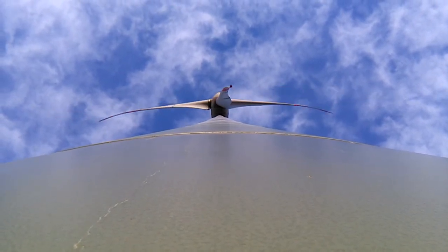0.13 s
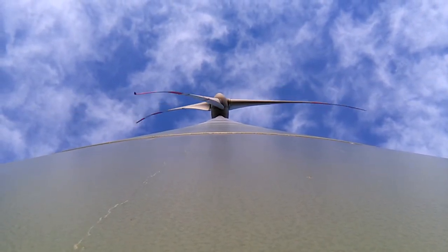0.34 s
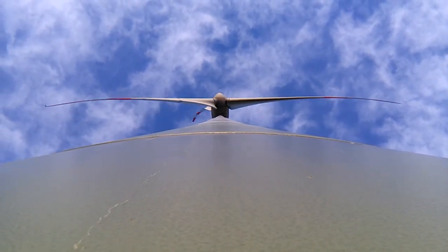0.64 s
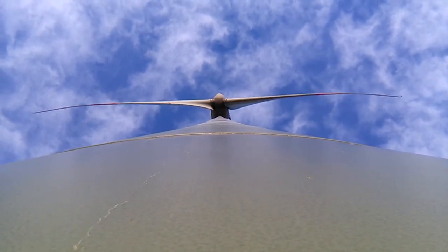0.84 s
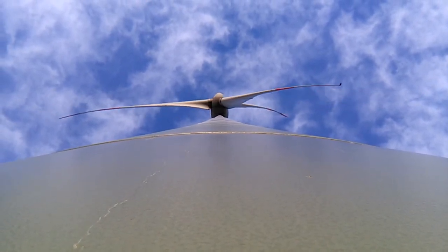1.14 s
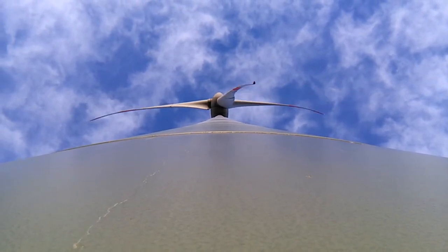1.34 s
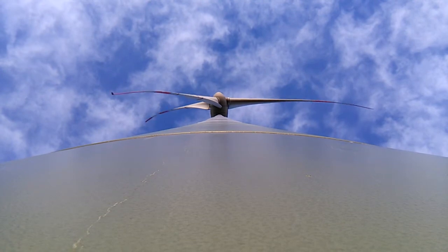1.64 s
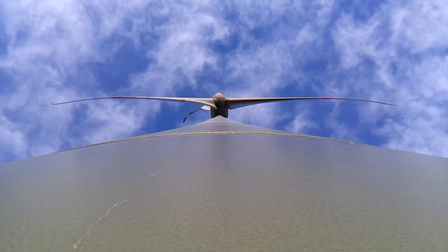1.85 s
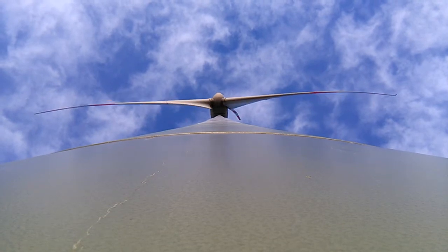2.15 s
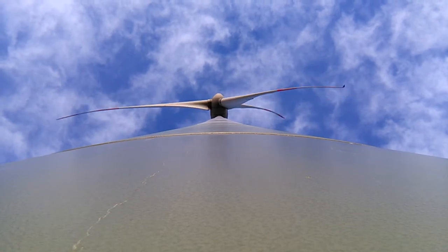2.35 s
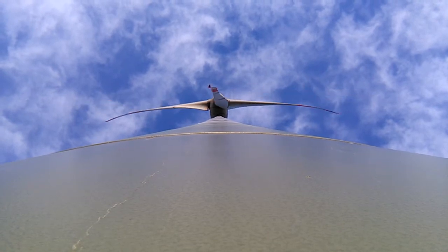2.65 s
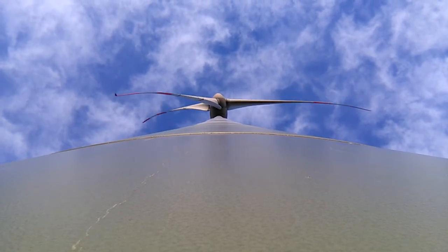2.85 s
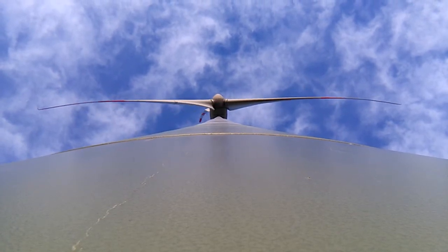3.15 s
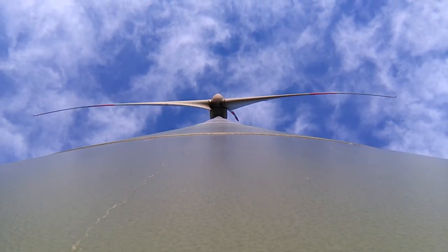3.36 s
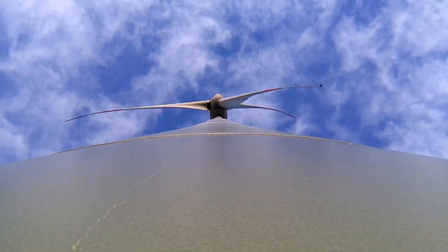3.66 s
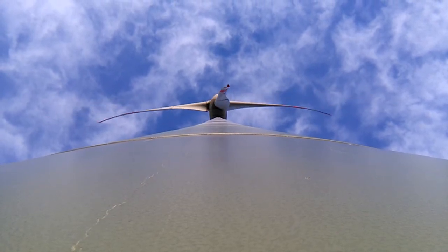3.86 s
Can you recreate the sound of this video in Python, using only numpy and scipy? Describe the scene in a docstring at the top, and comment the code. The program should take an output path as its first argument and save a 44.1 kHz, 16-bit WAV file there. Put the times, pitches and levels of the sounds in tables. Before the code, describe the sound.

Wind turbine blades swish past the tower overhead, peaking near 0.5, 1.7 and 3.0 seconds, with another rising at the end. Each soft whoosh swells treble first, then trails off in thin hiss. Beneath lie a wavering hollow rush, faint gear whine and low hum. Wind on the outdoor microphone starts quiet, builds from 0.7, and rumbles, thumps and buffets strongly around 1.3, 2.0, 3.3 and 3.9.

```python
"""At the foot of a wind turbine's tower, looking up. About every 1.2 s a blade starts down with a thin hiss,
swishes past the tower and trails off. The swish is coloured noise that swells with nearness, treble first.
The rotor adds narrow bands of noise: a hollow rush near 1 kHz, a faint gear whine and a low hum.
Gusts are low noise that rumbles, thumps and buffets on the microphone, with a breeze over open ground."""
import sys
import numpy as np
from scipy import signal
from scipy.fft import rfft, irfft
from scipy.io import wavfile
from scipy.ndimage import uniform_filter1d

SR = 44100
rng = np.random.default_rng(int(sys.argv[2]) if len(sys.argv) > 2 else 0)


def bounce(signal):
    """Save signal as a 16-bit WAV file at the path given by the first command-line argument."""
    frames = np.transpose(np.atleast_2d(signal))
    limited = np.clip(frames, -1, 1)
    pcm = np.round(limited * 32767).astype(np.int16)
    wavfile.write(sys.argv[1], SR, pcm)


N = 176400
T = np.arange(N) / SR  # time of every sample, in seconds

# Noise colours below set only the balance between pitches; each noise is then scaled to the same strength.

# A blade tip turns downwards and hisses; length counts from the start to the beginning of the fade:
# start_s, level_db, attack_s, length_s
DOWNSTROKES = [(-.08, -66, .06, 0.63), (1.238, -70, 0.06, .43), (2.391, -67, 0.23, 0.58),
               (3.668, -70.5, .06, .4)]
# Colour of the tip hiss: pitch_hz, relative_db_per_hz
TIP_HISS_COLOUR = [(2000, 3.5), (2800, 5), (4000, -32), (5600, -11.5), (6400, 2.5), (7100, 10), (7900, 5.5),
                   (8700, -7), (14000, -19)]
TIP_RELEASE_S = 0.23

# The gliding hollow rush of the rotor, level before the two trims below: time_s, centre_hz, level_db
RUSH = [(0.0, 947, -54), (0.09, 925, -55.5), (.25, 962, -63), (0.43, 1085, -64), (.55, 1154, -50),
        (0.68, 1242, -49), (0.74, 1190, -56), (1.0, 1213, -56), (1.11, 928, -55.5), (1.33, 960, -53.5),
        (1.5, 996, -64), (1.69, 1047, -59.5), (1.78, 1201, -59.5), (1.88, 1135, -52), (1.96, 1039, -50),
        (2.13, 1148, -65), (2.36, 1100, -58), (2.52, 1050, -49.5), (2.66, 1001, -55), (2.78, 1017, -51.5),
        (2.85, 1093, -54.5), (3.04, 1100, -50.5), (3.19, 1167, -50), (3.29, 945, -52.5),
        (3.57, 999.4, -47.5), (3.77, 949, -46.5), (4.0, 1021, -51)]
RUSH_WIDTH_HZ, RUSH_TRIM_DB = 476, -3.5
CORE_WIDTH_HZ, CORE_TRIM_DB = 105, -6.5  # the narrow core of the rush
CORE_WANDER_HZ, CORE_WANDER_RATE_HZ = 85, 14
CORE_FLUTTER_DB, CORE_FLUTTER_RATE_HZ = 3.5, 13

# Whine of the gears: time_s, level_db
GEAR = [(0, -65), (.9, -74), (1.3, -63), (1.6, -73), (1.96, -60.5), (2.2, -71), (3.1, -68), (3.4, -58),
        (3.75, -59), (4, -59)]
GEAR_HZ, GEAR_WIDTH_HZ = 957, 14
HUM_HZ, HUM_WIDTH_HZ, HUM_DB = 117.1, 9.8, -52.5

# Wind on the microphone, rising and falling with the gusts: time_s, level_db
WIND = [(0, -62), (.28, -55), (.46, -45), (.68, -40), (.75, -34.5), (.92, -34.5), (1.0, -40.5), (1.15, -37),
        (1.27, -28), (1.36, -32.5), (1.52, -35), (1.77, -39), (1.86, -38.5), (2.06, -33), (2.22, -34),
        (2.32, -40), (2.41, -32.5), (2.51, -40.5), (2.56, -33.5), (2.85, -36), (3.15, -36.5), (3.33, -31),
        (3.45, -35.5), (3.6, -32.5), (3.75, -33.5), (4, -33)]
# Colour of the wind rumble: pitch_hz, relative_db_per_hz
RUMBLE_COLOUR = [(20, -23), (30, -1.5), (40, -10), (52, -3), (68, -2.5), (115, -2), (160, -6.5),
                 (230, -9.5), (320, -18), (450, -29), (700, -47), (1500, -70)]
DEEP_HZ, DEEP_LUMPS_DB, UPPER_LUMPS_DB, LUMPS_RATE_HZ = 100, 2.6, 1.8, 24
STEADY_WINDOW_S = 0.05

# Wind over the open ground: time_s, level_db
BREEZE = [(0, -46), (.35, -49.5), (.8, -56), (1.3, -47.5), (1.6, -54.5), (1.95, -49), (2.25, -50.5),
          (2.55, -49), (3.1, -53), (3.45, -56), (3.65, -51), (4, -47.5)]
# Colour of the breeze: pitch_hz, relative_db_per_hz
AIR_COLOUR = [(30, 15.5), (120, 11.5), (300, -1), (550, -.5), (760, -2), (1000, -4), (1450, -2.5),
              (1900, -9), (2150, -13), (3000, -17.5), (4500, -33), (5600, -33), (7300, -28), (9000, -39)]
FLOOR_DB, FLOOR_FLUTTER_DB = -78.5, 0.7  # faint, slightly wavering hiss under everything

# Soft climbing bands of noise before, around and just after a blade's pass; the centre is the pitch at the peak:
# peak_s, level_db, half_length_s, centre_hz
FLARES = [(0.238, -50.5, 0.061, 2786), (0.383, -55.5, 0.11, 3920), (.55, -56.5, .035, 3050),
          (1.39, -62.5, 0.078, 2820), (1.688, -53.5, .08, 3970), (1.763, -51, 0.053, 3006),
          (2.679, -58.5, 0.092, 2760), (2.92, -60, 0.03, 3910), (3.05, -56, 0.054, 3140),
          (3.92, -57.5, 0.077, 2750)]
FLARE_WIDTH_HZ, FLARE_CLIMB_HZ_PER_S = 1030, 1300

# A blade passes the tower; treble is relative to the level, and a longer approach or retreat is more gradual:
# nearest_s, level_db, approach_s, retreat_s, treble_db, wake_db
PASSES = [(.465, -52, 0.14, 0.11, 3.5, -71), (1.726, -47, 0.11, .1, 1, -69),
          (2.959, -50.5, 0.15, 0.16, -2, -64), (4.1, -56, .2, .2, -1, -68)]
# Colour of the swish: pitch_hz, relative_db_per_hz
SWISH_COLOUR = [(880, -57), (1500, -4), (1730, -4), (1930, -0.5), (2120, -9.5), (2280, -1), (2940, 4.5),
                (3510, -2.5), (3710, 0), (4230, -1.5), (4560, -8.5), (5100, -7), (5600, -14.5),
                (6090, -11.5), (7770, -11.5), (8140, -15.5), (8860, -27), (14000, -41)]
PASS_FALLOFF = 1.57  # amplitude falls with distance to this power
TREBLE_HZ, TREBLE_LEAD_S = 4170, 0.037  # the treble is beamed ahead of the blade and crests earlier
# Colour of the bright edge just before a blade is nearest: pitch_hz, relative_db_per_hz
CREST_COLOUR = [(3200, -21), (3800, 13), (4400, -13), (5000, -2), (5600, -11), (7700, 0), (8700, -20),
                (14000, -32)]
CREST_LEAD_S, CREST_HALF_S, CREST_DB = 0.043, 0.024, -57.5
# Colour of the faint second swell as a blade climbs away: pitch_hz, relative_db_per_hz
WAKE_COLOUR = [(2200, -41), (2800, 14), (3400, 8), (4400, 7.5), (4800, 9.5), (5600, -19), (7300, 2),
               (8600, -10)]
WAKE_LAG_S, WAKE_HALF_S = 0.32, 0.09

# A large eddy gives a deep thump: peak_s, level_db, half_length_s
THUMPS = [(0.475, -36, 0.055), (0.796, -33, 0.029), (0.927, -30.5, .018), (1.243, -25.5, 0.028),
          (1.286, -23.5, 0.011), (1.342, -26, 0.0065), (1.433, -38, 0.019), (1.579, -29, 0.012),
          (1.759, -31.5, .025), (1.93, -26.5, 0.0043), (2.024, -25, 0.0081), (2.074, -26.5, 0.023),
          (2.186, -27, 0.011), (2.541, -30, 0.018), (2.62, -35.5, 0.011), (3.307, -26, 0.0091),
          (3.371, -26.5, 0.015), (3.636, -31.5, 0.021), (3.86, -26.5, 0.0084), (3.946, -30, 0.013)]
# Colour of the thumps: pitch_hz, relative_db_per_hz
THUMP_COLOUR = [(25, -22.5), (48, -1), (75, 2.5), (115, -2.5), (170, -12.5), (300, -37.5)]
# A small eddy buffets the microphone, muffled above its top pitch: peak_s, level_db, attack_s, decay_s, top_hz
BUFFETS = [(0.611, -41.5, 0.0077, 0.019, 377), (.71, -57, 0.0033, 0.025, 342),
           (0.752, -35, 0.001, 0.011, 960), (0.831, -44, .008, 0.005, 450), (.92, -38, .014, 0.029, 517),
           (1.19, -37.5, 0.017, 0.028, 430), (1.307, -31, 0.015, 0.053, 640),
           (1.974, -25.5, 0.0036, 0.025, 770), (2.059, -34.5, .012, 0.025, 476),
           (2.183, -38.5, .006, 0.024, 333), (2.551, -33, 0.0064, .03, 489),
           (2.68, -44.5, 0.033, 0.17, 550), (3.3, -42, 0.13, 0.31, 432), (3.619, -38, 0.12, 0.11, 745),
           (3.85, -36, 0.027, 0.097, 743), (3.95, -35.5, 0.027, 0.069, 640)]
# Colour of the buffets before muffling: pitch_hz, relative_db_per_hz
BUFFET_COLOUR = [(60, -22), (150, -1.5), (240, 2.5), (400, -5.5), (560, -11.5), (740, -16.5), (900, -22),
                 (1500, -24.5), (3000, -56)]

PATCH_EDGES_HZ = np.geomspace(1500, 9000, 14)  # borders of the bands that waver separately
PATCH_DB, PATCH_RATE_HZ = 2.1, 18
LOW_CUT_HZ, CUTOFF_HZ, EDGE_FADE_S = 47.6, 14250, 0.004


def from_db(db):
    """Turn decibels into gain."""
    return 10 ** (np.asarray(db) / 20)


def rms_one(x):
    """Scale a sound to an average strength (rms) of 1."""
    return x / np.sqrt(np.mean(x ** 2) + 1e-20)


def in_time(rows):
    """Draw straight lines between a table's times, giving each other column sample by sample."""
    times, *columns = np.transpose(rows)
    return [np.interp(T, times, column) for column in columns]


def drift(rate_hz):
    """Slow random wandering with spread 1; a higher rate wanders faster."""
    hz = np.arange(N // 2 + 1) * SR / N
    spectrum = rfft(rng.standard_normal(N))
    return rms_one(irfft(spectrum / (1 + (hz / rate_hz) ** 2), N))


def flutter(depth_db, rate_hz):
    """Gain that wavers with the turbulence."""
    return from_db(depth_db * drift(rate_hz))


def noise(colour):
    """Noise of a given colour, rms 1."""
    hz, db = np.transpose(colour)
    bins = np.arange(1, N // 2 + 2) * SR / N
    # beyond both ends of the table the noise fades out
    outside = np.minimum(1, np.minimum(bins / hz[0], hz[-1] / bins)) ** 2
    gain = from_db(np.interp(np.log(bins), np.log(hz), db)) * outside
    return rms_one(irfft(rfft(rng.standard_normal(N)) * gain, N))


def narrow_noise(hz, width_hz):
    """A band of noise around a fixed or moving centre, rms 1."""
    phase = 2 * np.pi * np.cumsum(hz * np.ones(N)) / SR
    return drift(width_hz / 2) * np.cos(phase) + drift(width_hz / 2) * np.sin(phase)


def evened(x, window_s):
    """Take the slow chance swells out of a noise, so that its envelope mainly sets the level."""
    size = max(int(window_s * SR), 2)
    power = uniform_filter1d(uniform_filter1d(x ** 2, size), size)
    return x / np.sqrt(power + 1e-9)


def patchy(x):
    """Eddies of different sizes come and go, so each narrow band wavers by itself."""
    band = np.searchsorted(PATCH_EDGES_HZ, np.arange(N // 2 + 1) * SR / N)
    spectrum = rfft(x)
    out = 0
    for k in np.unique(band):
        out = out + irfft(spectrum * (band == k), N) * flutter(PATCH_DB, PATCH_RATE_HZ)
    return rms_one(out)


def swell(peak_s, half_s):
    """A bell-shaped rise and fall around a peak."""
    return np.exp(-0.5 * ((T - peak_s) / half_s) ** 2)


def tip_hiss():
    """Thin hiss that opens as a tip turns downwards, holds and dies."""
    level = 0
    for start_s, db, attack_s, length_s in DOWNSTROKES:
        opening = np.clip((T - start_s) / attack_s, 0, 1)
        dying = np.exp(-np.maximum(T - start_s - length_s, 0) / TIP_RELEASE_S)
        level = level + from_db(db) * opening * dying
    return level * patchy(noise(TIP_HISS_COLOUR))


def rotor_rush():
    """A hollow rush, made of a wide gliding band of noise around a narrow, wandering core."""
    hz, db = in_time(RUSH)
    wide = from_db(RUSH_TRIM_DB) * narrow_noise(hz, RUSH_WIDTH_HZ)
    core_hz = hz + CORE_WANDER_HZ * drift(CORE_WANDER_RATE_HZ)
    core = from_db(CORE_TRIM_DB) * narrow_noise(core_hz, CORE_WIDTH_HZ)
    core = core * flutter(CORE_FLUTTER_DB, CORE_FLUTTER_RATE_HZ)
    return from_db(db) * (wide + core)


def gear_whine():
    """The gears whine as a very narrow band of noise, rising and falling in level."""
    db, = in_time(GEAR)
    return from_db(db) * narrow_noise(GEAR_HZ, GEAR_WIDTH_HZ)


def drive_hum():
    """The drive hums as a low, very narrow band of noise."""
    return from_db(HUM_DB) * narrow_noise(HUM_HZ, HUM_WIDTH_HZ)


def microphone_wind():
    """A continuous rumble follows the gusts, its deep and upper parts wavering apart."""
    db, = in_time(WIND)
    flow = noise(RUMBLE_COLOUR)
    deep = signal.sosfiltfilt(signal.butter(3, DEEP_HZ, fs=SR, output="sos"), flow)
    upper = flow - deep
    lumpy = deep * flutter(DEEP_LUMPS_DB, LUMPS_RATE_HZ) + upper * flutter(UPPER_LUMPS_DB, LUMPS_RATE_HZ)
    return from_db(db) * evened(lumpy, STEADY_WINDOW_S)


def open_air():
    """Broad breeze over a faint wavering hiss."""
    db, = in_time(BREEZE)
    breeze = from_db(db) * noise(AIR_COLOUR)
    hiss = from_db(FLOOR_DB) * rng.standard_normal(N) * flutter(FLOOR_FLUTTER_DB, rate_hz=12)
    return breeze + hiss


def climbing_flares():
    """Soft bands of noise that swell and climb before, around and just after a blade's pass."""
    steep = signal.butter(4, FLARE_WIDTH_HZ / 2, fs=SR, output="sos")
    out = 0
    for peak_s, db, half_s, centre_hz in FLARES:
        hz = centre_hz + FLARE_CLIMB_HZ_PER_S * (T - peak_s)
        phase = 2 * np.pi * np.cumsum(hz) / SR
        # two slow noises carried on a cosine and a sine make one band around the climbing pitch
        a, b = signal.sosfilt(steep, rng.standard_normal((2, N)))
        band = rms_one(a * np.cos(phase) + b * np.sin(phase))
        out = out + from_db(db) * swell(peak_s, half_s) * band
    return out


def bright_crest():
    """Each blade hisses brightly for a moment just before it is nearest."""
    level = sum(swell(nearest_s - CREST_LEAD_S, CREST_HALF_S) for nearest_s, *_ in PASSES)
    return from_db(CREST_DB) * level * noise(CREST_COLOUR)


def passing_level(t, peaks_db):
    """Amplitude of all blades at times t, falling as a power of distance from each one's peak level."""
    power = 0
    for (nearest_s, _, approach_s, retreat_s, *_), peak_db in zip(PASSES, peaks_db):
        # distance is 1 at the nearest point
        distance = np.hypot(1, (t - nearest_s) / np.where(t < nearest_s, approach_s, retreat_s))
        power = power + (from_db(peak_db) / distance ** PASS_FALLOFF) ** 2
    return np.sqrt(power)


def blade_swish():
    """Trailing-edge noise swells and fades as each blade passes, the treble first."""
    _, db, _, _, treble_db, _ = np.transpose(PASSES)
    edge = patchy(noise(SWISH_COLOUR))
    body = signal.sosfiltfilt(signal.butter(2, TREBLE_HZ, fs=SR, output="sos"), edge)
    treble = edge - body
    swish = body * passing_level(T, db) + treble * passing_level(T + TREBLE_LEAD_S, db + treble_db)
    return swish * flutter(depth_db=1.78, rate_hz=7.5)


def thumps():
    """Deep pushes of large eddies ride on the rumble."""
    level = sum(from_db(db) * swell(peak_s, half_s) for peak_s, db, half_s in THUMPS)
    return level * evened(noise(THUMP_COLOUR), window_s=0.025)


def buffets():
    """Small eddies give short bursts of noise, each reaching up to its own top pitch."""
    flow, out = noise(BUFFET_COLOUR), 0
    for peak_s, db, attack_s, decay_s, top_hz in BUFFETS:
        stretch = np.roll(flow, rng.integers(N))  # a different stretch of noise for each burst
        burst = signal.sosfilt(signal.butter(4, top_hz, fs=SR, output="sos"), stretch)
        level = from_db(db) * np.exp(-np.abs(T - peak_s) / np.where(T < peak_s, attack_s, decay_s))
        out = out + level * evened(burst, window_s=0.014)
    return out


def blade_wake():
    """Each blade hisses softly once more as it climbs away."""
    level = 0
    for nearest_s, *_, wake_db in PASSES:
        level = level + from_db(wake_db) * swell(nearest_s + WAKE_LAG_S, WAKE_HALF_S)
    return level * noise(WAKE_COLOUR)


def scene():
    """Blades, rotor and wind add up at one microphone."""
    blades = tip_hiss() + climbing_flares() + bright_crest() + blade_swish() + blade_wake()
    rotor = rotor_rush() + gear_whine() + drive_hum()
    wind = microphone_wind() + open_air() + thumps() + buffets()
    return (blades + rotor + wind)[None]


def record(dry):
    """The microphone drops the deepest bass; the ends are eased and the top is cut steeply."""
    thinned = signal.sosfilt(signal.butter(4, LOW_CUT_HZ, "high", fs=SR, output="sos"), dry)
    eased = thinned * np.minimum(1, np.minimum(T, T[::-1]) / EDGE_FADE_S)
    return signal.sosfilt(signal.ellip(12, 0.2, 80, CUTOFF_HZ, fs=SR, output="sos"), eased)


dry = scene()
out = record(dry)
bounce(out)
```